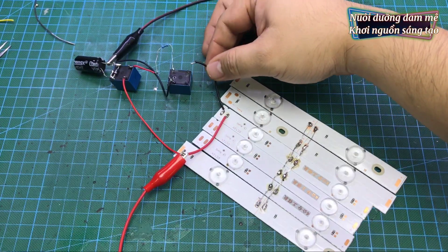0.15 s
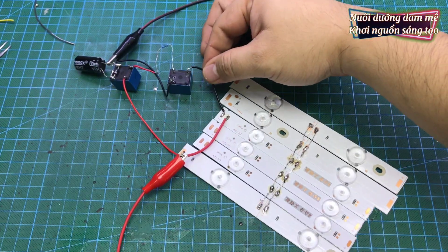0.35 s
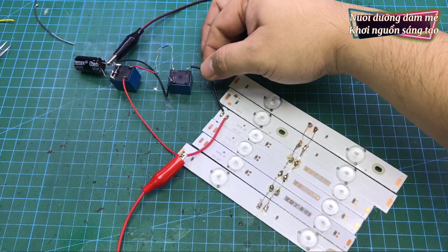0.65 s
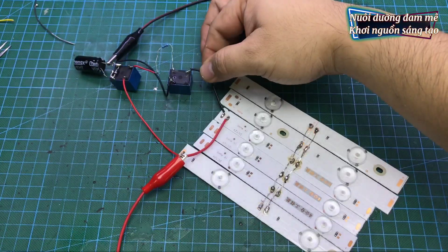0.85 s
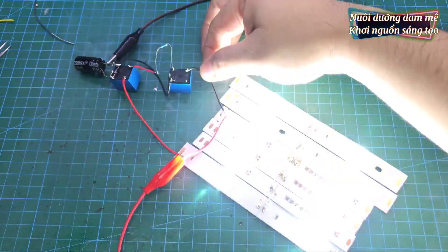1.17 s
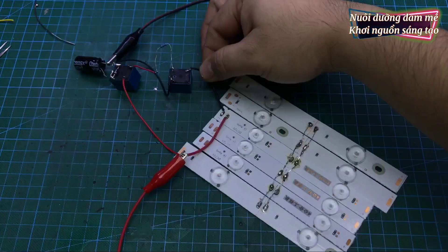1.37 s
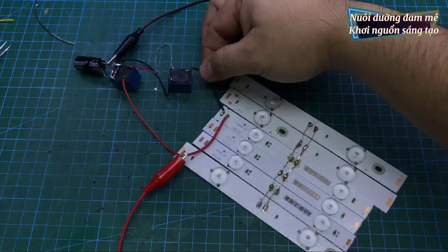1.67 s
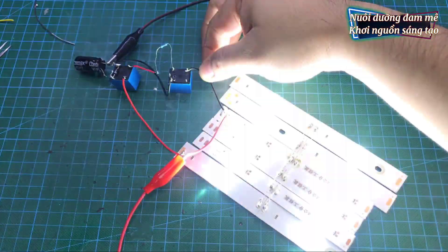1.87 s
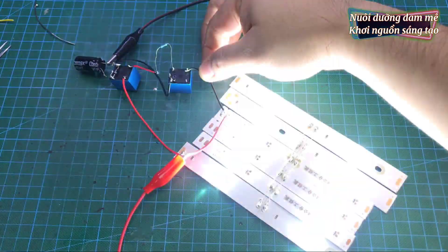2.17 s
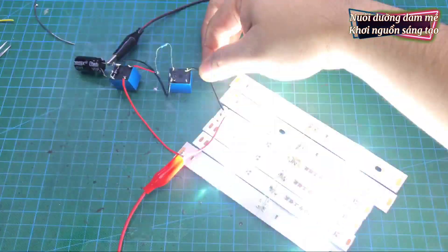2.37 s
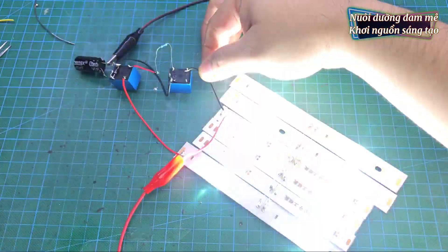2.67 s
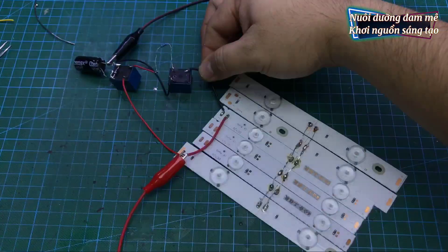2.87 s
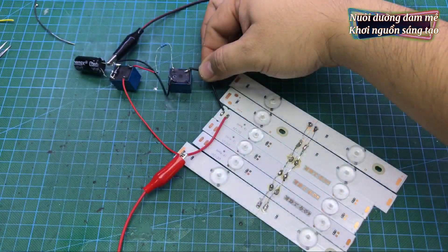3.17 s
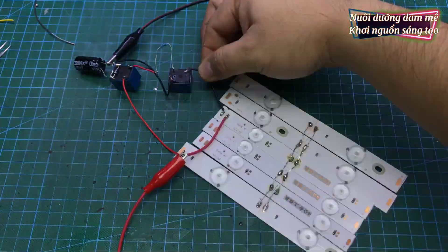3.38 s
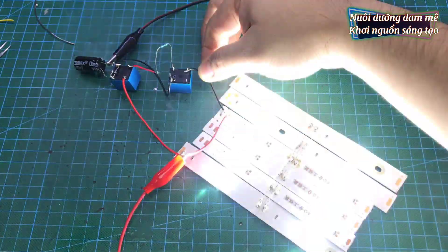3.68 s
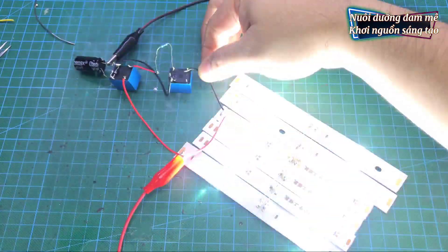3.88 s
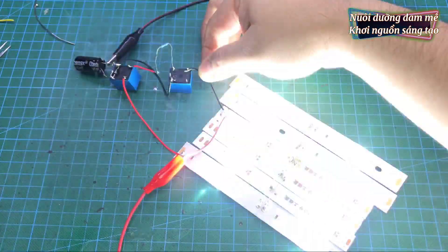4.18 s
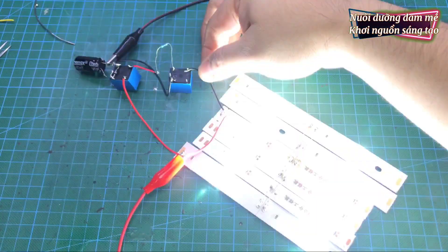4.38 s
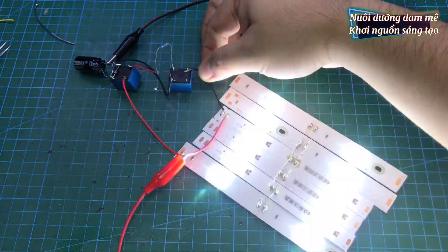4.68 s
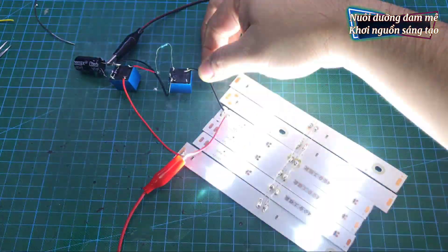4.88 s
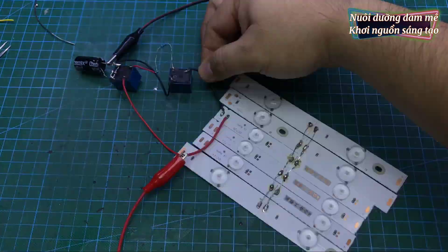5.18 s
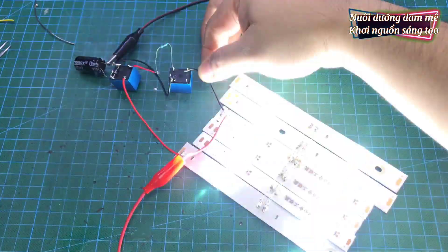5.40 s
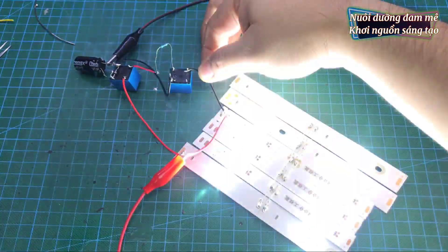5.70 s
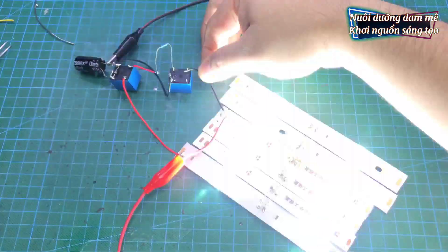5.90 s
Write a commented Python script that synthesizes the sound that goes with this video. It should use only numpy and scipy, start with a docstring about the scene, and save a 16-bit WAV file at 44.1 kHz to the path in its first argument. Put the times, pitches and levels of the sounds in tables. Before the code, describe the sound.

In a small workshop, a tiny relay on a cutting mat clicks continuously for about six seconds, close to a phone microphone. A soft release tick comes at once, then a hard snap at 0.1 s; the pair repeats every 0.3 s, ticks at about 0.3, 0.6 and 0.9 s, snaps at 0.4, 0.7 and 1.0 s, and so on to the end. Snaps are loud, bright and metallic, with a light touch just before, a few milliseconds of chatter and usually a small rebound. Ticks are thinner, with more plastic case in them; those near 2.7, 5.35 and 5.95 s are faint and rattly. Dull taps fall around 0.4-0.5 s and 1.1 s, a lower one at 2.35 s. A short bright room tail follows each click. Quiet bass rumble continues underneath, with a wavering low hum swelling near 0.7, 2.5 and 3.7 s.

```python
"""In a workshop, a small relay on a cutting mat clicks on and off about three times a second, close to a phone.
Pull-ins are a touch of the contacts, a slam of the armature and usually a rebound; releases are softer ticks.
Each click is a hard contact and a flurry of tiny ones that set metal and case ringing; a few dull taps join in.
Decaying noise makes a short bright room tail; a wavering low hum and dull noise rumble lie underneath."""
import sys
import numpy as np
from scipy import signal
from scipy.fft import rfft, irfft, next_fast_len
from scipy.io import wavfile

SR = 44100
rng = np.random.default_rng(int(sys.argv[2]) if len(sys.argv) > 2 else 0)


def dump(signal):
    """Clip the signal to [-1, 1] and save it as 16-bit WAV at the path in sys.argv[1]."""
    limited = np.clip(np.atleast_2d(signal).T, -1, 1)
    pcm = np.round(limited * 32767).astype(np.int16)
    wavfile.write(sys.argv[1], SR, pcm)


N = 266672  # length in samples
RING_LENGTH = int(.04 * SR)  # length of one blow in samples
TOUCH_LEAD_S = .0027  # from the first touch to the slam, and from the slam to the chatter

# armature and core, ringing while closed: f/Hz, relative level/dB, time to fall by 60 dB/s
CLOSED_MODES = [(6096, 0, 0.0055), (7220, -11.5, 0.013), (7860, 1.5, 0.01), (8230, 2, 0.013),
                (8940, 3, 0.0066), (10020, 2.5, 0.005), (11120, -6, 0.0089), (12240, -2.5, 0.01),
                (14170, -3.5, 0.0082), (14450, -6.5, .004), (15300, -4, 0.0081)]
# plastic case and the mat under it: f/Hz, relative level in a pull-in/dB, relative level in a release/dB,
# time to fall by 60 dB/s
CASE_MODES = [(1435, -71, -10.5, 0.014), (1870, -28, -10, 0.02), (2513, -22.5, -8, 0.021),
              (2700, -41, -38, 0.0057), (3274, -50, 2.5, 0.0067), (3870, -45, -16, 0.03),
              (4330, -9, -3.5, 0.0079), (4825, -32, -3.5, 0.015)]


def undb(db):
    """Gain of a level in dB."""
    return 10 ** (np.asarray(db) / 20)


def high_pass(x, hz):
    """Steep cut below hz."""
    return signal.sosfilt(signal.butter(5, hz, "high", fs=SR, output="sos"), x)


def add(out, sound, s):
    """Mixes a sound in at time s."""
    start = int(s * SR)
    part = sound[..., :max(N - start, 0)]
    out[..., start:start + part.shape[-1]] += part


def coloured(gain):
    """Noise of rms 1 whose spectrum follows gain(Hz)."""
    size = next_fast_len(N)
    hz = np.maximum(np.arange(size // 2 + 1) * SR / size, 1.)
    spectrum = rfft(rng.standard_normal(size)) * gain(hz)
    noise = irfft(spectrum, size)[:N]
    return noise / np.std(noise)


def rumble():
    """Broad dull noise, strongest in the bass, with a slowly changing level."""
    # colour of the noise: f/Hz, relative level/dB
    rumble_colour = [(20, -19), (40, -3), (70, -3.5), (125, -4.5), (190, -12), (265, -8), (330, -12),
                     (430, -18.5), (630, -16.5), (1000, -24.5), (1600, -33.5), (3000, -37.5), (5500, -46),
                     (8500, -46.5), (9900, -46), (10600, -47), (15000, -49)]
    # loudness of the noise: t/s, rms level/dB
    rumble_level = [(0, -36), (1.5, -38), (3, -38), (4.5, -37.5), (6.05, -39.5)]
    colour_hz, colour_db = np.transpose(rumble_colour)

    def gain(f):
        curve = undb(np.interp(np.log(f), np.log(colour_hz), colour_db))
        return curve * np.minimum(f / colour_hz[0], 1) ** 2  # falls away below the first point

    t = np.arange(N) / SR
    return undb(np.interp(t, *np.transpose(rumble_level))) * coloured(gain)


def hum():
    """A low sine whose pitch wavers at random while it swells and fades."""
    # loudness of the hum: t/s, rms level/dB
    hum_level = [(0.0, -57), (0.1, -42.5), (0.57, -41.5), (0.66, -34), (1.13, -44), (2.46, -40.5),
                 (2.54, -31), (3.01, -45), (3.42, -41.5), (3.62, -55), (3.71, -37), (4.71, -48),
                 (4.88, -52), (5.09, -40.5), (5.98, -46), (6.05, -61)]
    centre_hz, waver_hz, waver_rate_hz = 68.5, 2.6, 9
    waver = coloured(lambda f: 1 / (1 + (f / waver_rate_hz) ** 2))
    cycles = np.cumsum(centre_hz + waver_hz * waver) / SR
    tone = np.sqrt(2) * np.sin(2 * np.pi * cycles)  # rms 1
    t = np.arange(N) / SR
    return undb(np.interp(t, *np.transpose(hum_level))) * tone


def ring(hz, db, t60, scatter_db=0.66):
    """Decaying modes after one blow, neighbours in opposite phase; each blow wakes them a little differently."""
    t = np.arange(RING_LENGTH) / SR
    level_chance, pitch_chance = rng.standard_normal((2, len(hz), 1))
    sign = (-1) ** np.arange(len(hz))[:, None]
    gain = sign * undb(db[:, None] + scatter_db * level_chance)
    pitch = hz[:, None] * (1 + 0.0047 * pitch_chance)
    decay = np.exp(-np.log(1000) * t / t60[:, None])  # a factor of 1000 is 60 dB
    return np.sum(gain * decay * np.sin(2 * np.pi * pitch * t), axis=0)


def blow(db, metal, case_db, rattle_ms, rise_ms, hard_db):
    """A hard contact inside a dying flurry of tiny ones: the direct sound, and what the walls get."""
    ms = 1000 * np.arange(RING_LENGTH) / SR
    rise = 1 - np.exp(-ms / max(rise_ms, .02))
    fall = np.exp(-ms / max(rattle_ms, .2))
    flurry = rise * fall * rng.standard_normal(RING_LENGTH)
    hard = np.zeros(RING_LENGTH)
    hard[int(rise_ms * SR / 1000)] = undb(hard_db)

    case_hz, _, _, case_t60 = np.transpose(CASE_MODES)
    thin = ring(*np.transpose(metal))
    case = ring(case_hz, case_db, case_t60)
    # the heavier case answers mostly to the hard contact
    near = signal.fftconvolve(hard + flurry, thin) + signal.fftconvolve(hard + .3 * flurry, case)
    # summed over all directions the resonances blur
    far = (thin + case) * np.exp(-ms / .9)
    both = np.array([near[:RING_LENGTH], far])
    # a longer rattle carries more energy at the same peak
    strength = undb(db) * np.sqrt(5.0 + 14 * rattle_ms)
    return strength * both / np.linalg.norm(both, axis=1, keepdims=True)


def releases():
    """The contact spring rings as it lets go; a longer rattle shakes the case more."""
    # releases: t/s, tick level before the rattle-length boost/dB, rattle decay time/ms
    release_list = [(0.0145, -17.5, 5.9), (0.3166, -20.5, 3.9), (0.6104, -16.5, 4.6), (.9067, -16, 4.7),
                    (1.2036, -17.5, 1.76), (1.5003, -15.5, 0.94), (1.7952, -15.5, 2.9),
                    (2.0931, -16.5, 3.5), (2.3900, -18, 3.5), (2.685, -31, 13), (2.9785, -16.5, 4.5),
                    (3.2813, -12, 0.72), (3.5746, -16, 4.5), (3.8716, -14, 1.8), (4.1613, -16, 3.5),
                    (4.4614, -16.5, 4.2), (4.7545, -17, 4.5), (5.0547, -19, 0.68), (5.3498, -30.5, 12.6),
                    (5.6418, -19.5, 5.1), (5.942, -33.5, 15.5)]
    # contact spring: f/Hz, relative level/dB, time to fall by 60 dB/s
    open_modes = [(6890, -9, 0.01), (7700, -2, 0.0048), (8490, 2.5, 0.0053), (9180, -1.5, 0.0091),
                  (9670, 4, 0.0057), (10700, -7, 0.0054), (11700, 0.5, 0.0039), (13040, -5, .005),
                  (13800, -6.5, .005), (15500, 3, 0.0043)]
    share_db, db_per_doubling = -2, 2.5  # case share after a 1 ms rattle, and its growth per doubling
    drop_db = np.transpose(CASE_MODES)[2]
    out = np.zeros((2, N))
    for s, tick_db, rattle_ms in release_list:
        case_db = drop_db + share_db + db_per_doubling * np.log2(rattle_ms)
        add(out, blow(tick_db, open_modes, case_db, rattle_ms, rise_ms=0.11, hard_db=12.2), s)
    # so small a body radiates no bass; the release thumps the mat a little lower than a pull-in
    return high_pass(out, 1205)


def pull_ins():
    """The contacts meet, the armature slams onto the core, and the contacts chatter on."""
    # pull-ins: t of the slam/s, slam level/dB, first touch level/dB (both before the rattle-length boost),
    # chatter decay time/ms, extra case share in the slam/dB
    pull_in_list = [(0.0982, -3.5, -12, 4.2, 4), (0.393, -3, -20, 1.9, 6), (0.6916, -3, -23, 3, 6),
                    (0.985, -5.5, -10, 6.4, -4), (1.282, -5, -13, 4, 5.5), (1.5787, -3, -41, 4.4, 3),
                    (1.8780, -9.5, -9, 1.7, -5), (2.1743, -6.5, -11.5, 2.8, -16),
                    (2.4660, -9, -28, 13.3, -22), (2.7689, -7.5, -37, 2.7, -9), (3.063, -6, -14, 3.8, 8),
                    (3.3599, -10, -22, 5.6, -2), (3.654, -7, -10, 4.1, 1), (3.9520, -6.5, -24, 3.8, -1.5),
                    (4.2485, -9.5, -16, 5.2, -28), (4.5406, -4, -22, 1.8, 7.5),
                    (4.8336, -6.5, -11, 5.4, 4.5), (5.1342, -4.5, -24, 2.2, 2), (5.4269, -5, -22, 3.6, 9.5),
                    (5.7238, -5, -23, 5.1, 6), (6.0238, -6, -29, 1.9, 2)]
    pull_db = np.transpose(CASE_MODES)[1]
    out = np.zeros((2, N))
    for s, slam_db, touch_db, chatter_ms, case_db in pull_in_list:
        touch = blow(touch_db, CLOSED_MODES, pull_db + 9.5, rattle_ms=2.3, rise_ms=0.33, hard_db=10.4)
        slam = blow(slam_db, CLOSED_MODES, pull_db + case_db, rattle_ms=0.91, rise_ms=.45, hard_db=7.8)
        chatter = blow(slam_db - 13.5, CLOSED_MODES, pull_db, chatter_ms, rise_ms=1.0, hard_db=-13)
        add(out, touch, s - TOUCH_LEAD_S)
        add(out, slam, s)
        add(out, chatter, s + TOUCH_LEAD_S)
    return high_pass(out, 1860)  # so small a body radiates no bass


def rebounds():
    """The armature bounces back onto the core, which barely shakes the case."""
    # rebounds: t/s, level before the rattle-length boost/dB
    rebound_list = [(.1056, -14.5), (.4018, -13.5), (0.697, -10), (0.9934, -12), (1.2902, -11),
                    (1.5880, -18), (1.8796, -14.5), (2.1780, -16.5), (2.471, -11.5), (3.0653, -12),
                    (3.0708, -14.5), (3.3622, -9), (3.6588, -14), (3.6616, -12), (3.9541, -12),
                    (4.2502, -8.5), (4.5440, -14), (4.5473, -17), (4.8348, -11), (4.8415, -12),
                    (5.1380, -18), (5.4302, -15.5), (5.4372, -17), (5.726, -13), (5.732, -13),
                    (6.0267, -14.5)]
    pull_db = np.transpose(CASE_MODES)[1]
    out = np.zeros((2, N))
    for s, db in rebound_list:
        add(out, blow(db, CLOSED_MODES, pull_db - 12.0, rattle_ms=1.18, rise_ms=0.46, hard_db=5.3), s)
    return high_pass(out, 1860)


def bench_taps():
    """Dull taps on the bench, each ringing three modes; the highest is weakest and dies fastest."""
    # taps, by their lowest mode: t/s, level/dB, f/Hz, time to fall by 60 dB/s
    tap_list = [(.380, -35, 3520, 0.012), (0.419, -34.5, 3260, 0.011), (0.477, -39, 3230, 0.0093),
                (1.101, -42.5, 3300, 0.0089), (2.353, -27.5, 1026, 0.015)]
    out = np.zeros(N)
    for s, db, hz, t60 in tap_list:
        modes_hz = hz * np.array([1, 1.35, 2.9])
        modes_db = db - np.array([0, 3., 12.])
        add(out, ring(modes_hz, modes_db, t60 / np.array([1, 1, 3.])), s)
    return out


def room(dry):
    """Diffuse tail: decaying noise in bands, building up over the first milliseconds."""
    # bands of the tail: lower edge f/Hz, upper edge f/Hz, gain on the noise/dB, time to fall by 60 dB/s
    room_bands = [(990, 2570, -39, 0.14), (3100, 8300, -45.5, 0.18), (8000, 8600, -37.5, 0.22),
                  (7150, 10600, -41.5, 0.2), (10000, 16000, -41, 0.16), (13170, 14000, -51, 0.16)]
    t = np.arange(SR // 2) / SR
    tail = 0
    for low_hz, high_hz, db, t60 in room_bands:
        band_filter = signal.butter(2, [low_hz, high_hz], "band", fs=SR, output="sos")
        band = signal.sosfilt(band_filter, rng.standard_normal(len(t)))
        tail = tail + undb(db) * band * np.exp(-np.log(1000) * t / t60)
    build_up = 1 - np.exp(-t / 0.0011)
    return signal.fftconvolve(dry, tail * build_up)[:N]


def scene():
    """Background, clicks and taps, and the room's answer to them."""
    background = rumble() + hum()
    near, far = releases() + pull_ins() + rebounds() + bench_taps()
    return (near + room(far) + background)[None]


def record(dry):
    """The microphone dips in the treble; the loudest peaks are rounded, and the phone cuts the top."""
    dip_hz, dip_width_hz, dip_share = 10460, 360, 0.52  # share: part of the narrow band taken away
    top_hz = 15380
    narrow_band = signal.lfilter(*signal.iirpeak(dip_hz, dip_hz / dip_width_hz, fs=SR), dry)
    dipped = dry - dip_share * narrow_band
    rounded = .8 * np.tanh(dipped / .8)
    return signal.sosfilt(signal.ellip(10, .3, 70, top_hz, fs=SR, output="sos"), rounded)


dry = scene()
out = record(dry)
dump(out)
```